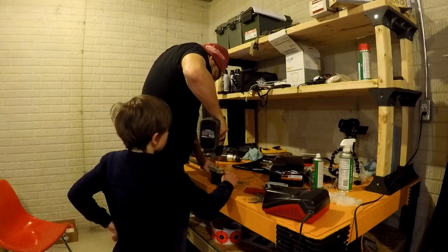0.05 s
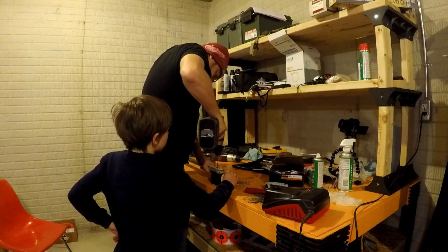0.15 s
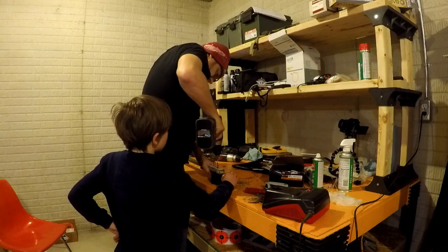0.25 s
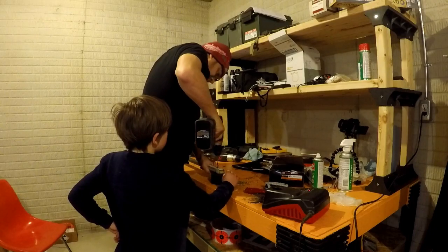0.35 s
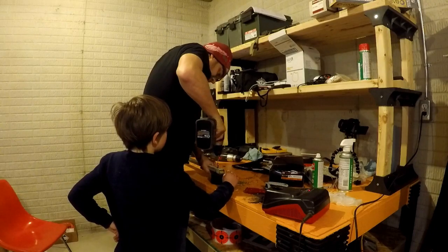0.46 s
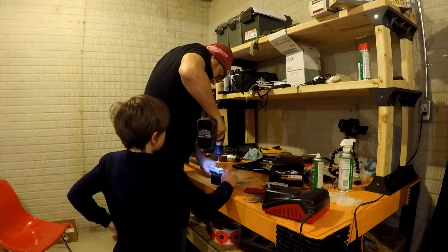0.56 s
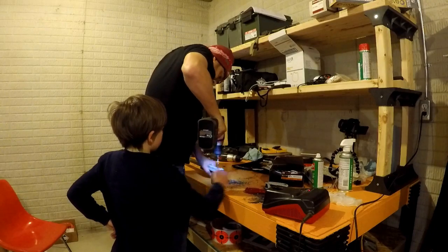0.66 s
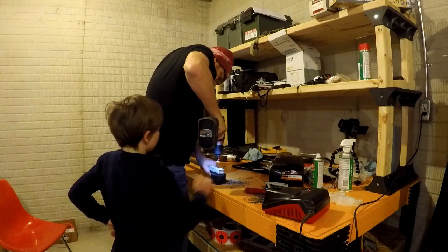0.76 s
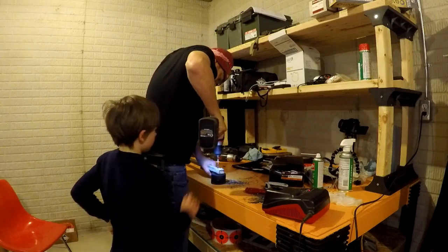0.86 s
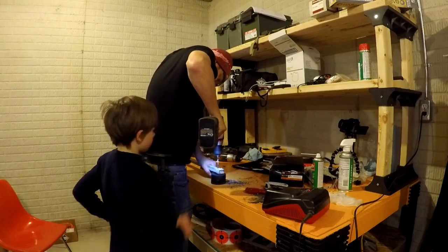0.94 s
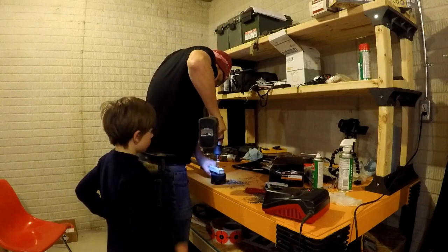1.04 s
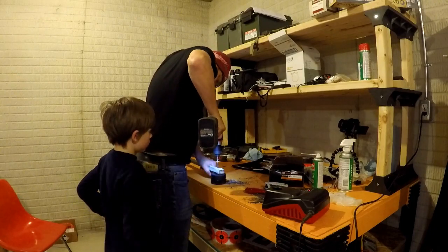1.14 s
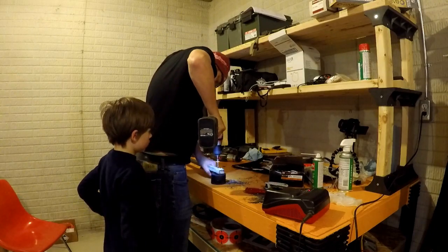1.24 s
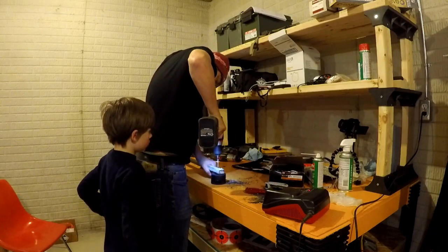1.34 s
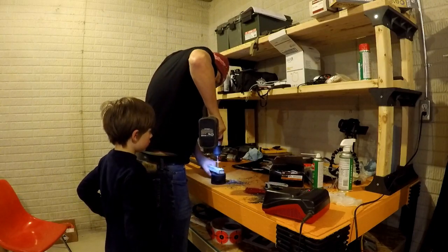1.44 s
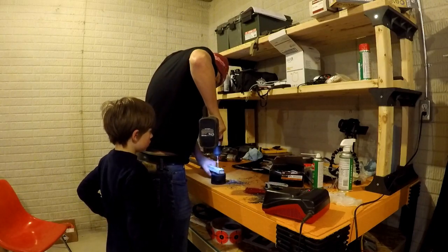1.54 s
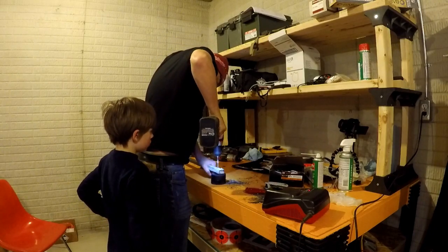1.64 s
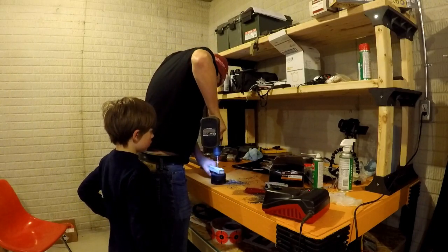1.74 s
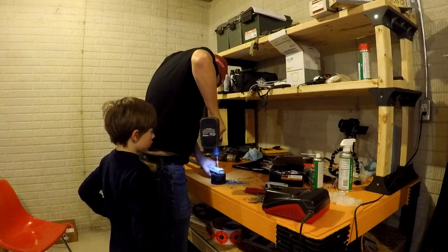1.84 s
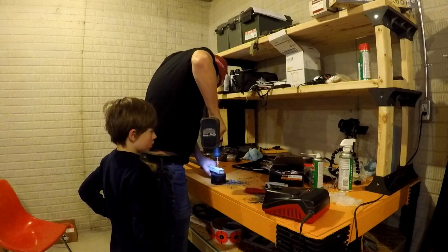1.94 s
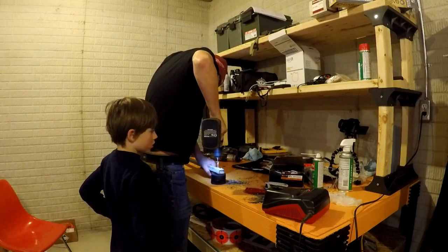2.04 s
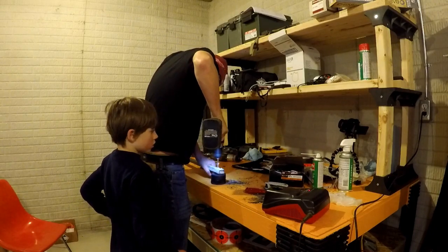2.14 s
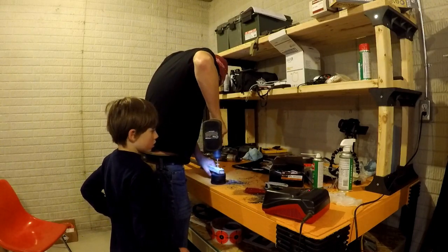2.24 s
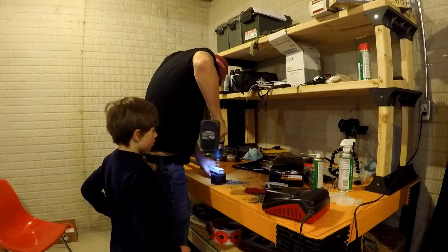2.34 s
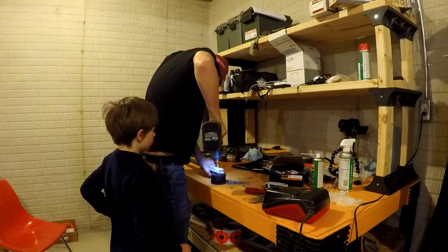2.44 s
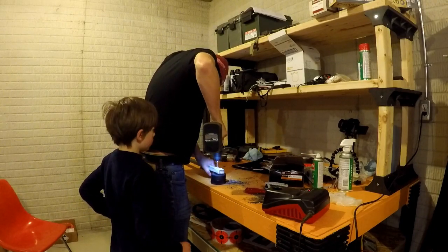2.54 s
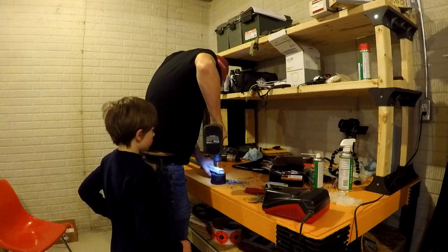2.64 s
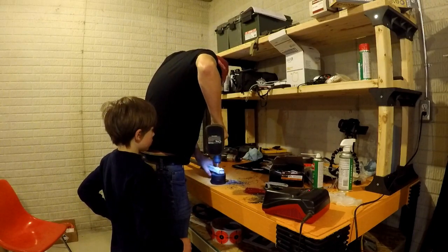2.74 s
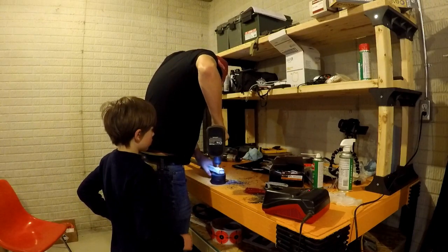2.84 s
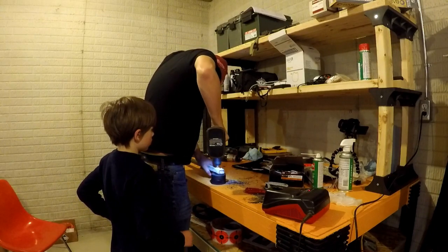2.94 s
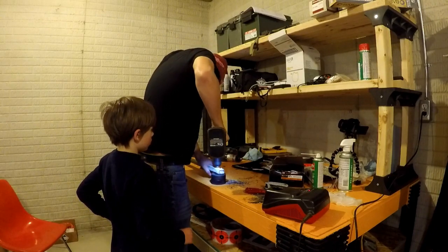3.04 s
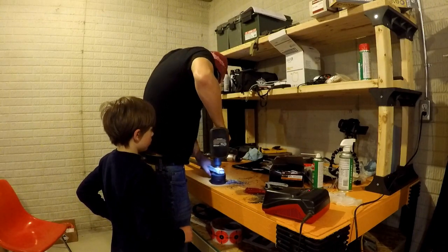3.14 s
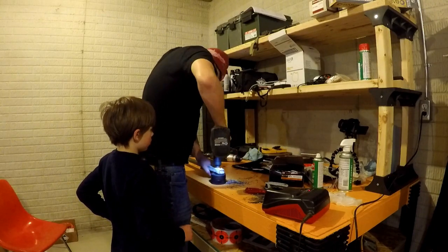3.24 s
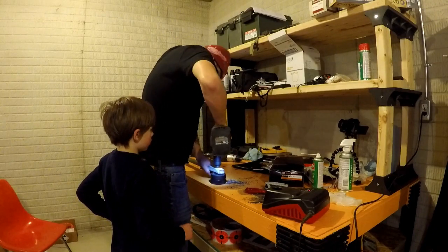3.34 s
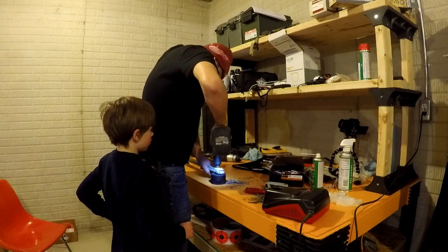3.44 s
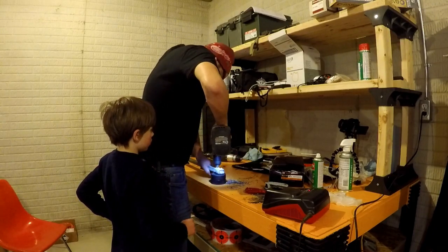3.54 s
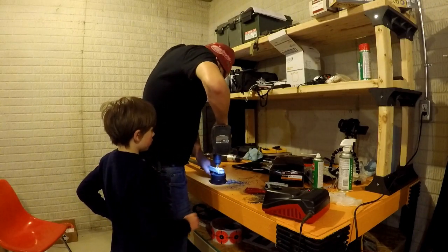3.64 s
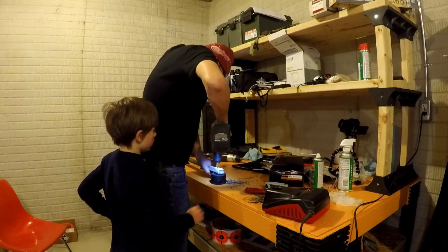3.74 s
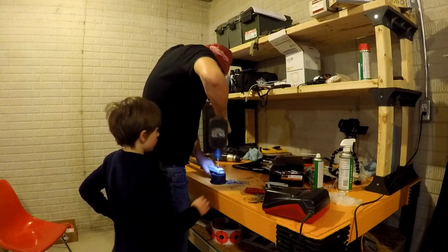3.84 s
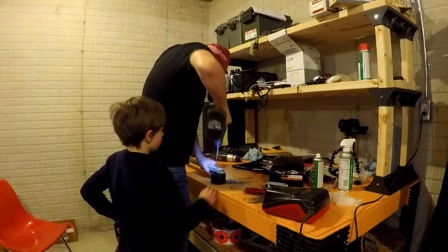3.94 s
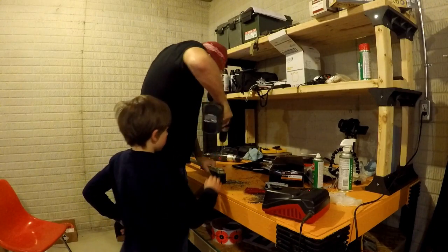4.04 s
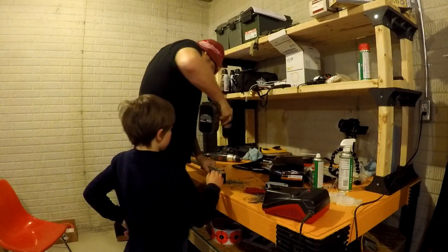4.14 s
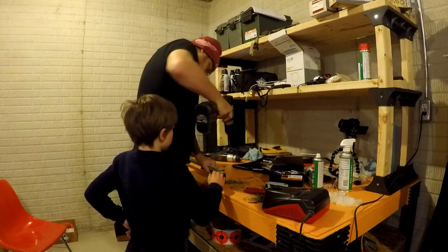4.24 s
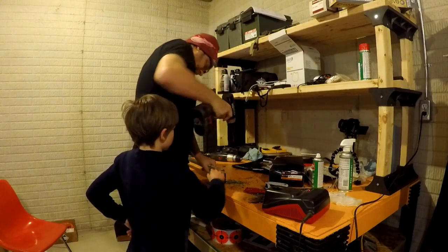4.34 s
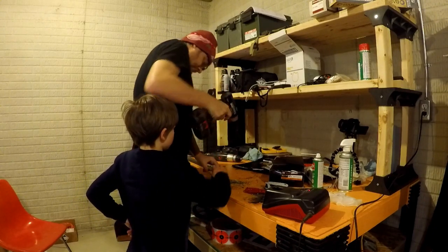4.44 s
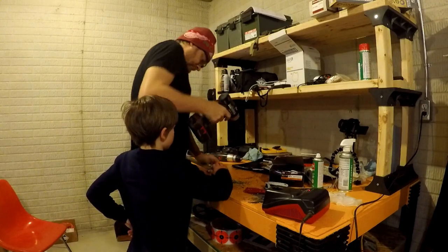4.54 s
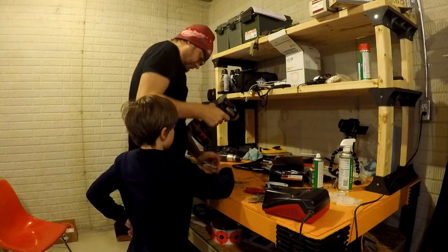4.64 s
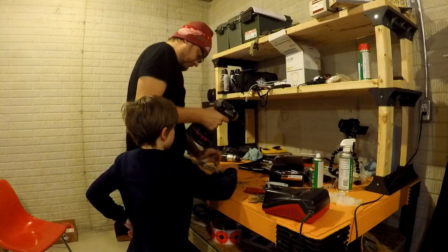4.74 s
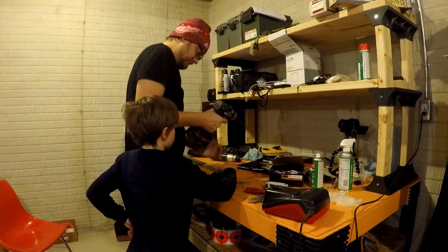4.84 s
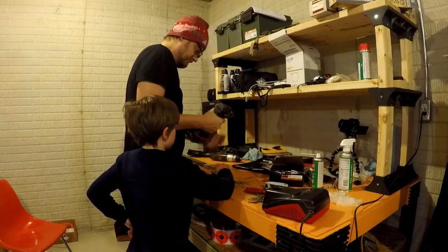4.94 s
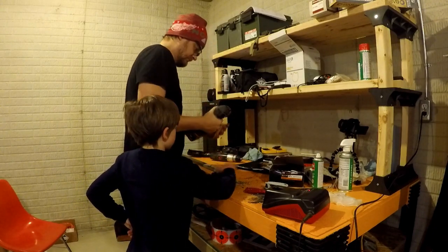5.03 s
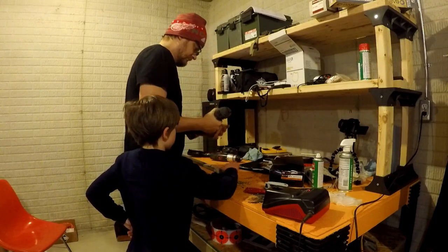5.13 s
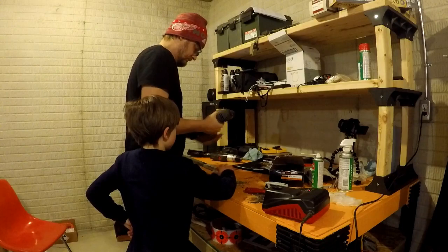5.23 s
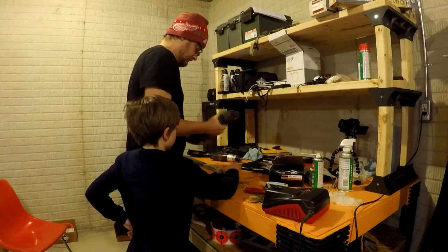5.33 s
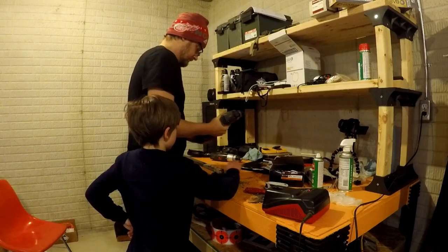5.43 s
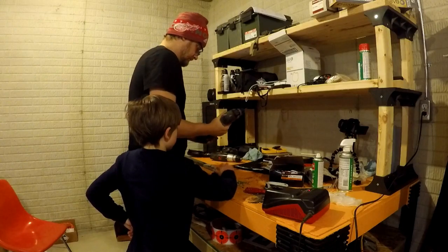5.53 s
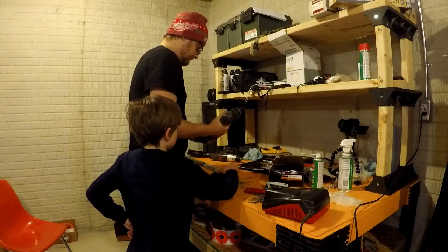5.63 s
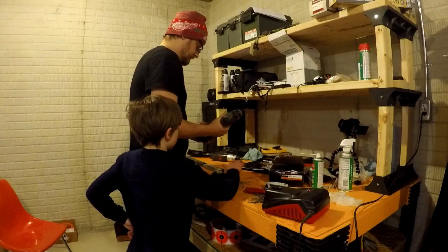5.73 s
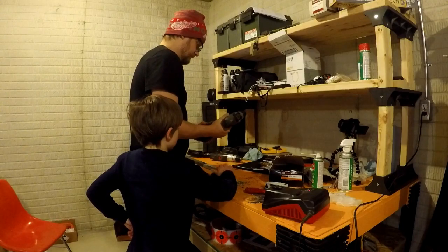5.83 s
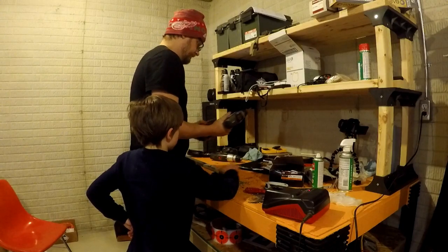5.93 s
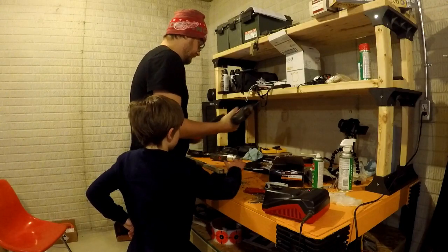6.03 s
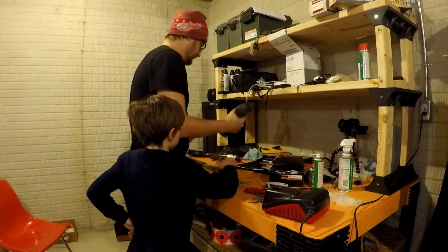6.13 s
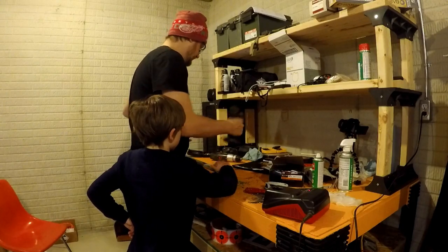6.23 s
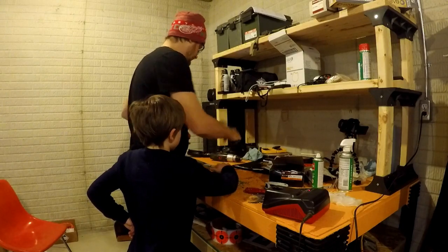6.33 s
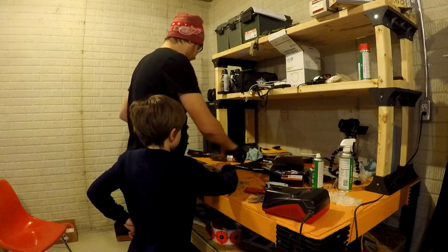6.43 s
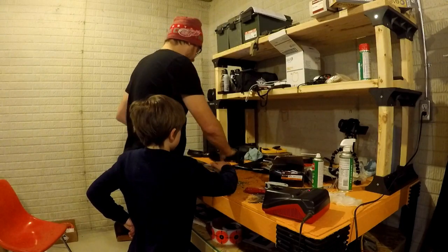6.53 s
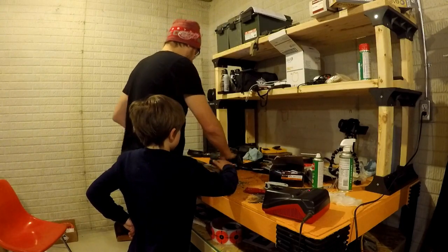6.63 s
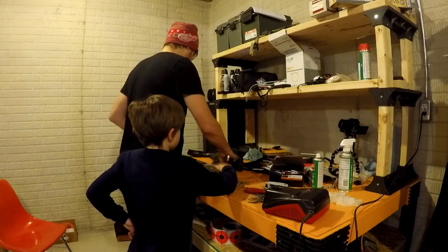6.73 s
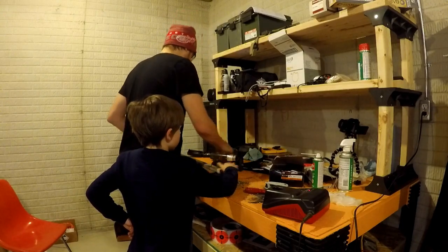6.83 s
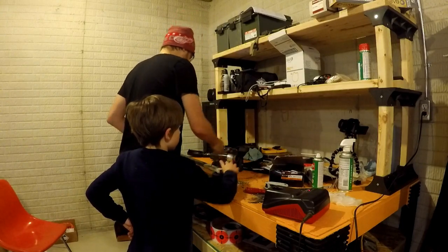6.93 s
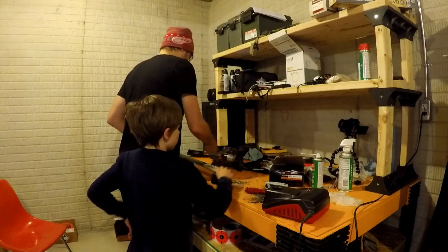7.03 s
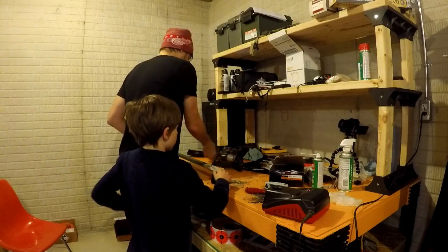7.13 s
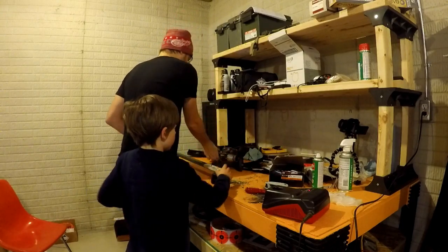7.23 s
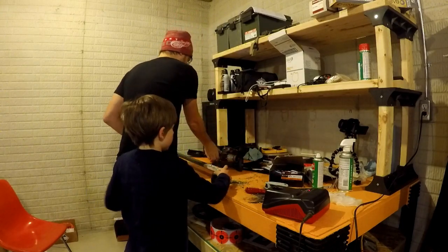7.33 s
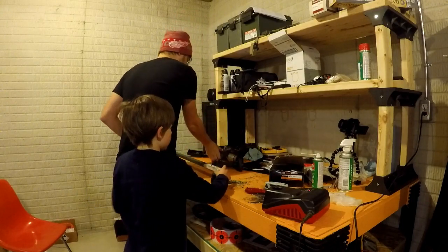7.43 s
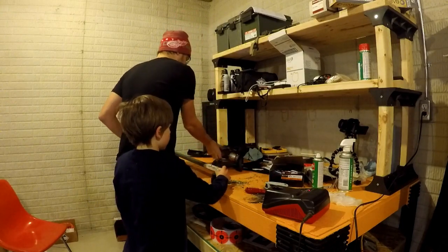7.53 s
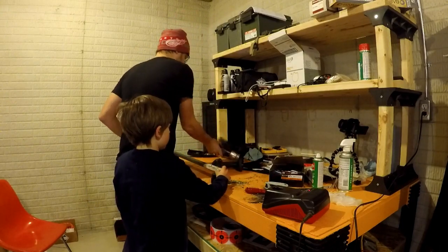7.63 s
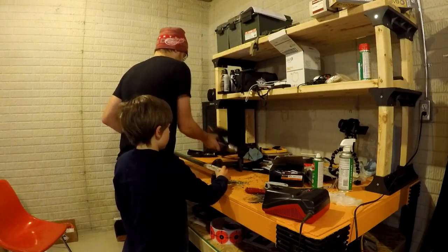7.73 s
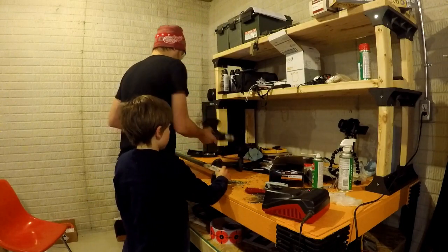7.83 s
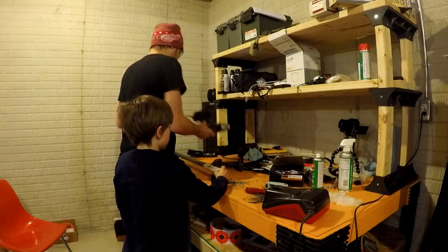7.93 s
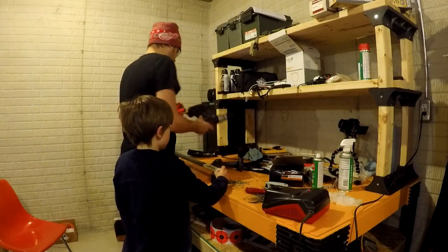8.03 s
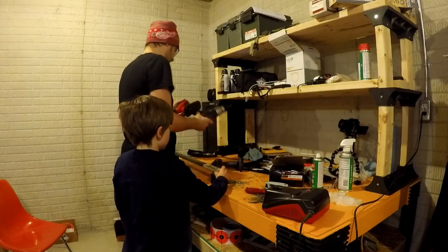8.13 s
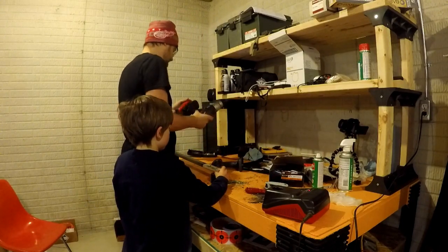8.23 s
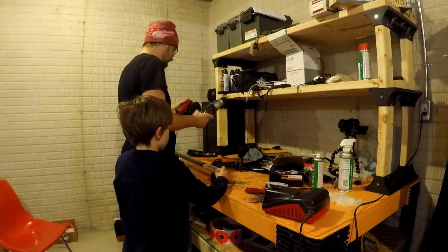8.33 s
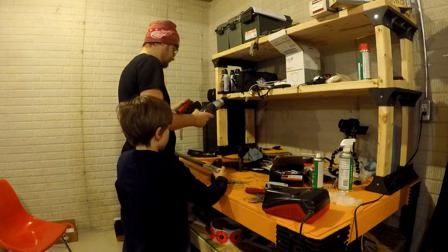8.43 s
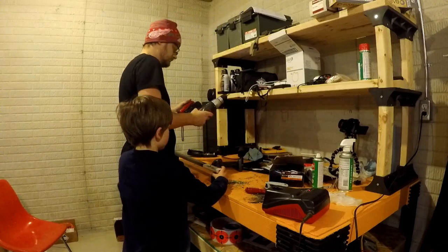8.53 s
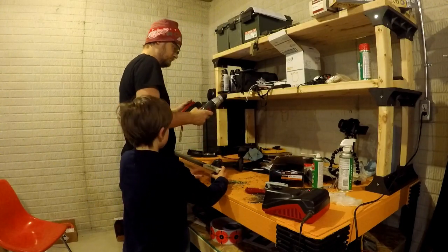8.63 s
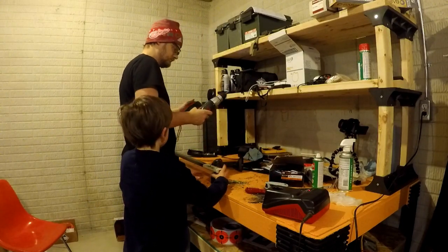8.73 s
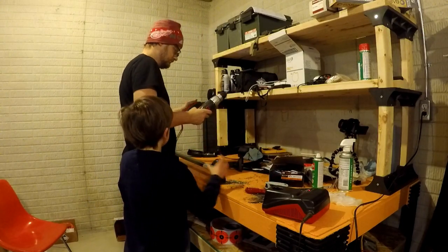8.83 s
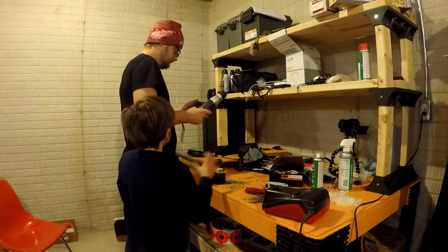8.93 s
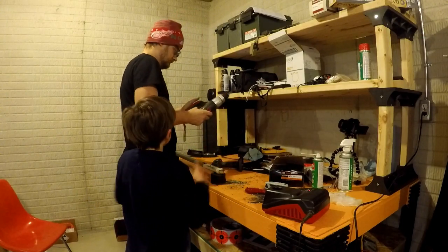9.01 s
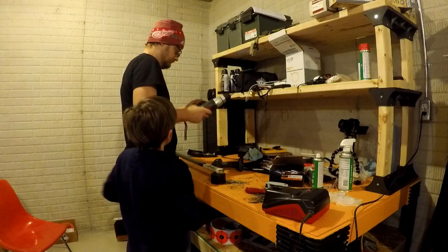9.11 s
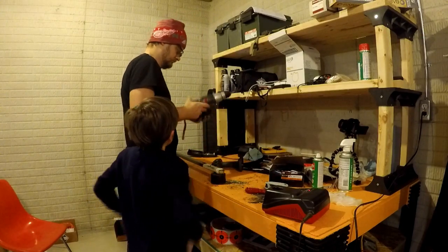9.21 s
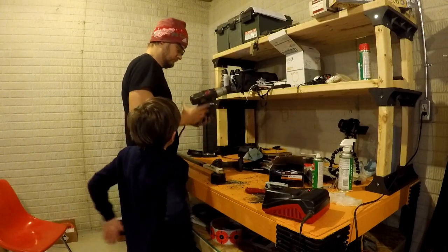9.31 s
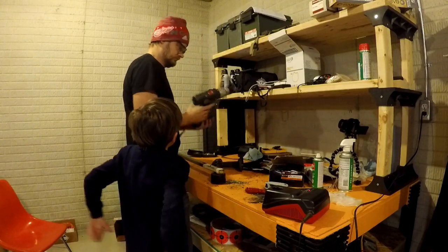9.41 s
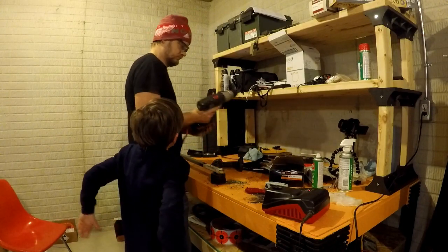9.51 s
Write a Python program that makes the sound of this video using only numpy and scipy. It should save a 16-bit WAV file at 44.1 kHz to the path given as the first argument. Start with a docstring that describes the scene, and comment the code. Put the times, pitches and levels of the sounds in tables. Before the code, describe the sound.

Power drill whine sags under load and recovers, a wooden workbench shudders, then tools thump, knock and clack on the bench in an echoing room.

```python
"""Cordless drill at a basement workbench

A cordless drill drives a long screw into a wooden bench in a bare, block-walled basement room.
Gear noise and lines that follow the shaft speed spin up, sag under the screw's drag and recover.
The bench rumbles as filtered noise and thumps in decaying low modes when blows land on it.
Hard contacts are noise bursts with a ringing body; knocks ring the drill's hollow plastic shell.
Echoes of the room, a brief scuff and a low rush of air surround them."""
import sys
import numpy as np
from scipy import signal
from scipy.fft import rfft, irfft, next_fast_len
from scipy.io import wavfile
from scipy.ndimage import uniform_filter1d, minimum_filter1d

SR = 44100
rng = np.random.default_rng(int(sys.argv[2]) if len(sys.argv) > 2 else 0)


def log_audio(samples):
    """Write samples as a 16-bit WAV file to the path given in sys.argv[1]."""
    # one column per channel
    frames = np.atleast_2d(samples).T
    # limit to full scale, then quantise
    limited = np.clip(frames, -1, 1)
    pcm = np.round(limited * 32767).astype(np.int16)
    wavfile.write(sys.argv[1], SR, pcm)


N = 422037
T = np.arange(N) / SR  # time of every sample [s]

# the trigger is half pulled, pulled right in, then let go [s]
HALF_S, FULL_S, RELEASE_S = .57, 1.09, 4.055
FULL_HZ = 352  # unloaded shaft speed at full trigger [turns per second]

# drag of the screw, tightest midway: (time [s], shaft speed lost [turns per second])
DRAG = [(1.33, 0), (1.45, 4.5), (1.6, 3), (1.9, 15), (2.22, 21), (2.38, 11), (2.48, 22), (2.6, 29),
        (2.7, 42), (2.85, 58), (2.99, 88), (3.09, 93), (3.27, 74), (3.38, 65), (3.64, 47), (3.71, 37),
        (3.82, 13), (3.92, 1)]
# blows on the bench: (time [s], level [dB], tilt [dB per octave], damping [factor on the decay rate])
THUMPS = [(1.955, -6, 5, 2), (2.33, -10, -3, 1.9), (2.426, 10, -17, 6), (2.441, 13, 6.5, 4.7),
          (2.46, 5, -2, 3.9), (2.54, -13.5, -20, 2.2), (3.825, -9.5, 13.5, 2.9), (4.35, -37, 4, 0.95),
          (6.426, -36, -5, 1.24), (6.475, -35.5, -3, 1.6), (6.666, 3, 8, 1.1), (6.785, 2, 10.5, 1.8),
          (7.182, -17, 5, 1.47), (7.386, 6, -4.5, 1.88), (7.495, -3.5, 3, 2.13), (7.534, -7.5, -19, 1.5),
          (7.633, -2, -6.5, 2.33), (7.735, -18, 4, 1.6)]


def amp(db):
    """Turns decibels into gain."""
    return 10 ** (np.asarray(db) / 20)


def unit(x):
    """Scales to rms 1."""
    return x / np.sqrt(np.mean(abs(x) ** 2) + 1e-20)


def read(points, hz):
    """Reads a spectrum table on a log-frequency axis."""
    f, value = np.transpose(points)
    return np.interp(np.log(hz + 1), np.log(f + 1), value)


def curve(rows, axis=1, outside=None):
    """Draws one column of a time table at every sample."""
    rows = np.array(rows, float)
    return np.interp(T, rows[:, 0], rows[:, axis], outside, outside)


def add(mix, s, sound):
    """Mixes a sound in at time s."""
    part = mix[..., round(s * SR):][..., :sound.shape[-1]]
    part += sound[..., :part.shape[-1]]


def shape(x, gain):
    """Filters by a gain given as a function of frequency."""
    size = next_fast_len(x.shape[-1])
    spectrum = rfft(x, size) * gain(np.fft.rfftfreq(size, 1 / SR))
    return irfft(spectrum, size)[..., :x.shape[-1]]


def colour(x, points):
    """Filters x by a spectrum table, at rms 1."""
    return unit(shape(x, lambda hz: amp(read(points, hz))))


def bump(hz, centre_hz, octaves):
    """A bell of height 1 on a log-frequency axis."""
    return np.exp(-(np.log2((hz + 1) / centre_hz) / octaves) ** 2)


def wander(hz):
    """A random drift of rms 1, with two new knots per cycle of hz."""
    knots = np.arange(0, T[-1] + 1, .5 / hz)
    return unit(np.interp(T, knots, rng.standard_normal(len(knots))))


def even(x, evenness=.7):
    """Smooths out a share (evenness) of the chance swings in a rumble's level, at rms 1."""
    power = abs(uniform_filter1d(x ** 2, size=1500))
    return unit(x / (power + 1e-9) ** (evenness / 2))


def causal(x, db):
    """Filters by a dB spectrum on the bins of x, at minimum phase so nothing rings ahead of the hit."""
    cepstrum = irfft(np.log(amp(np.maximum(db, -100))))
    half = len(cepstrum) // 2
    # folding the cepstrum onto positive time gives the minimum phase
    cepstrum[1:half] *= 2
    cepstrum[half + 1:] = 0
    return irfft(rfft(x) * np.exp(rfft(cepstrum)))


def diffuse(pair):
    """Two unrelated signals become a diffuse field whose likeness left to right varies with pitch."""
    # likeness of diffuse sound at the two microphone ports: (frequency [Hz], correlation)
    likeness = [(120, 0.83), (250, 0.14), (500, 0), (1000, 0), (2000, 0), (4000, 0.82), (8000, 0)]
    mid = shape(pair[0], lambda hz: np.sqrt((1 + np.clip(read(likeness, hz), -1, 1)) / 2))
    side = shape(pair[1], lambda hz: np.sqrt((1 - np.clip(read(likeness, hz), -1, 1)) / 2))
    return np.array([mid + side, mid - side])


def tail(build_s=0.0012, size=32768):
    """The echo of block walls at energy 1, each band dying at its own speed."""
    # reverberation: (frequency [Hz], time to fall 60 dB [s])
    decay = [(100, 0.68), (300, 0.83), (1000, 1), (3000, 0.72), (6000, 0.64), (12000, 0.44)]
    hz, t, bands = signal.stft(diffuse(rng.standard_normal((2, size))), SR, nperseg=256)
    bands = bands * amp(-60 * t / read(decay, hz)[:, None])
    echo = signal.istft(bands, SR, nperseg=256)[1][:, :size]
    echo *= 1 - np.exp(-np.arange(size) / SR / build_s)
    return echo / np.linalg.norm(echo[0])


def room(x, wet_db, early_db):
    """Joins direct sound, early reflections and the tail, at a fixed total energy."""
    # reflections off bench, shelves and walls: (left delay [s], right delay [s], relative level [dB])
    reflections = [(.0021, .0024, 3), (.0053, 0.0068, -4), (.0072, 0.007, -5), (0.0093, 0.0054, -17),
                   (0.014, .0138, -5), (0.0192, 0.013, -15)]
    response = amp(wet_db) * tail()
    response[:, 0] += 1
    for left, right, db in reflections:
        response[[0, 1], [round(left * SR), round(right * SR)]] += amp(db + early_db)
    response /= np.linalg.norm(response[0])
    return signal.fftconvolve(x[None], response, axes=1)[:, :N]


def ports(x):
    """The two microphone ports hear the bench with different level and phase."""
    # level difference: (frequency [Hz], left over right [dB])
    balance = [(60, -2), (170, 0.5), (380, -7), (700, -6), (1290, 1), (2400, -1), (4400, 1), (7500, .5),
               (9500, -9.5), (12000, 1)]
    # phase difference: (frequency [Hz], left's lead [rad])
    lead = [(3000, 0), (6700, 1.07), (9000, -3.5), (10500, 14.5), (11800, -5.5)]
    sign = np.array([[1], [-1]])  # each port takes half the difference

    def port_gain(hz):
        return amp(read(balance, hz) / 2) ** sign * np.exp(.5j * read(lead, hz) * sign)

    return shape(x, port_gain)


def air(level_db=-50, drift_db=-1.0, low_hz=105):
    """The low rush and hiss of the basement: diffuse noise, thinned in the bass, drifting slightly."""
    # (frequency [Hz], relative level [dB per Hz])
    air_tone = [(15, -43), (25, -11), (82, -39), (148, -1), (183, 1), (209, -0.5), (313, -6), (741, -14),
                (1080, -15.5), (3630, -25), (4620, -29), (6050, -24.5), (9550, -26.5), (12500, -37),
                (15500, -45)]
    rush = colour(diffuse(rng.standard_normal((2, N))), air_tone)
    rush = shape(rush, lambda hz: .4 + .6 * hz ** 6 / (hz ** 6 + low_hz ** 6))
    return rush * amp(level_db + drift_db * wander(1.0))


def scuff(grain=0.27):
    """A brief grainy rub: coloured noise of uneven strength."""
    # (time [s], level [dB])
    rub_level = [(5.87, -61), (5.905, -41.5), (5.94, -46.5), (5.975, -32.5), (5.99, -54), (6.02, -78)]
    # (frequency [Hz], relative level [dB per Hz])
    rub_tone = [(210, -46), (350, -31), (485, -1.5), (605, -10), (651, -15), (712, -0.5), (813, -26.5),
                (1050, -9), (1290, -21), (1490, -4), (2470, -18), (3310, -12.5), (4940, -20), (5730, -10.5),
                (12000, -42), (15600, -72), (22000, -120)]
    grains = rng.standard_normal(N) * np.exp(grain * wander(200))
    return colour(grains, rub_tone) * amp(curve(rub_level, outside=-120))


def knocks(centre_hz=1000):
    """Each handling knock rings the drill's hollow body; a rising tilt favours the high modes."""
    # the drill is set down and handled: (time [s], level [dB], tilt [dB per octave])
    hits = [(6.667, -22, 3.5), (7.384, -30, -6), (8.221, -28.5, 3), (8.262, -43, 4), (8.322, -33.5, -0.5),
            (8.356, -41, 3), (8.638, -36, -3)]
    # modes of the hollow plastic body: (frequency [Hz], relative level [dB], time to fall 60 dB [s])
    shell_modes = [(168, -5, 0.23), (326, -6, 0.14), (441, -9, 0.1), (499, -3.5, 0.11), (993, -9, 0.091),
                   (1350, -4, 0.12), (1590, -5, 0.12), (1823, -4.5, 0.07), (3080, -12.5, 0.05),
                   (3326, -12.5, 0.036), (4980, -13, 0.06)]
    out, t = np.zeros(N), np.arange(SR // 2) / SR
    for s, db, tilt_db in hits:
        for hz, mode_db, t60 in shell_modes:
            level_db = db + mode_db + tilt_db * np.log2(hz / centre_hz)
            tone = np.sin(2 * np.pi * (hz * t + rng.random()))
            add(out, s, amp(level_db - 60 * t / t60) * tone)
    return room(out, wet_db=-5, early_db=-3.5)


def clacks(ring_db=-7, bright_hz=3500, dull_hz=9500, spread=0.3, size=32768):
    """A crack, the dense short ring of a hard casing, then the room; soft contacts swell and ring longer."""
    # hard contacts: (time [s], level [dB], body resonance [Hz], its boost [dB], brightness [dB],
    # rise [s], room echo [dB])
    contacts = [(.587, -29, 3800, 9, -21, 0.0018, 5), (.83, -14, 2400, 11, 6, .00014, 1.5),
                (2.444, -6.5, 380, 9, -20, 0.0033, -1.5), (4.011, -10.5, 3580, 3, 11, 0.0012, -0.5),
                (4.718, -45, 6500, 9, 4, .0011, 0), (4.749, -44, 2450, 12, 2, .001, -2),
                (4.865, -46, 2300, 17, 3, .002, -3), (5.019, -45, 1900, 20, -5, .003, -4),
                (5.732, -41.5, 4020, 6, 19, .0036, -2), (6.235, -42, 3000, 6, 6, .006, 2),
                (6.319, -40, 4000, 11, 0, .006, -4), (6.6662, -5.5, 1550, 9, -11, 0.00022, -9),
                (6.673, -0.5, 584, 17, -9.5, 0.0034, -1), (6.757, -6, 415, 26, -9, 0.0024, -2),
                (7.3849, -17, 2070, -6.5, -9, 0.00044, -1), (7.39, -11, 305, 14.5, -27, 0.004, -0.5),
                (7.394, -18.5, 940, 20, -19, 0.0047, 2), (7.497, -28, 910, 10, -27, .008, -5),
                (7.625, -33.5, 2200, 15, -2, .0015, -4.5), (7.628, -24.5, 450, 16, -10, .007, -3),
                (7.656, -38.5, 6000, 9, 3, .002, 0.5), (8.2201, -16.5, 1400, 15.5, 8, 0.0003, -2),
                (8.226, -17, 234, 22, -7, 0.00087, -2), (8.322, -29.5, 1390, 4, 9, .003, -5),
                (8.637, -21, 330, 10.5, 3, 0.0045, 0.5), (8.704, -31, 5960, 6, 10, 0.0018, -0.5),
                (8.835, -25, 300, 15, 2, .03, 2), (8.9, -19, 1500, 4, -7, 0.00019, 3),
                (8.908, -9.5, 3300, 1.5, 3, 0.0024, -1), (8.936, -1, 3760, 5, 6.5, 0.000051, -2.5),
                (9.0174, -4.5, 2610, 5, 10, .0004, 2.5), (9.382, -30, 440, 15, -1, .0015, -4.5),
                (9.432, -28, 3980, 6, 3, 0.027, 1.5)]
    # (frequency [Hz], relative level [dB per Hz])
    casing_tone = [(88, -18.5), (150, -10.5), (326, -5.5), (366, -4.5), (436, -2), (509, -3.5), (656, -4),
                   (1320, -4.5), (1660, -3.5), (3830, -9), (5230, -11), (6230, -5), (12500, -38),
                   (15500, -49)]
    firm_s, firm_ring_s, ring_power = 0.00083, 0.066, .21  # a contact rising in firm_s rings firm_ring_s
    crack_share, body_octaves = 0.013, .55  # crack's time constant as a share of the ring; body width
    out, t, hz = np.zeros((2, N)), np.arange(size) / SR, np.fft.rfftfreq(size, 1 / SR)
    for s, db, body_hz, body_db, bright_db, rise, wet_db in contacts:
        ring_s = firm_ring_s * (rise / firm_s) ** ring_power
        snap, centre, side = rng.standard_normal((3, size))
        casing = centre + spread * side * [[1], [-1]]  # the shelves scatter the ring to both sides
        crack = snap * np.exp(-t / (crack_share * ring_s))
        blow = crack + amp(ring_db) * casing * np.exp(-np.log(1000) * t / ring_s)
        blow *= 1 - np.exp(-t / rise)
        blow += amp(wet_db) * np.linalg.norm(blow[0]) * tail(size=size)
        # each struck part has its own hollow resonance
        body = body_db / (1 + (np.log2((hz + 1) / body_hz) / body_octaves) ** 2)
        tone_db = read(casing_tone, hz) + body + bright_db * hz ** 2 / (hz ** 2 + bright_hz ** 2)
        # dull contacts lose the very top as well
        tone_db += min(bright_db, 0) * np.minimum(hz / dull_hz, 4 / 3) ** 4
        add(out, s, amp(db) * causal(blow, tone_db) / np.sqrt(np.mean(amp(tone_db) ** 2)))
    return out


def thumps(centre_hz=160):
    """Each blow sets the heavy bench swinging in its low modes, which build up and die away."""
    # bench modes: (frequency [Hz], relative level [dB], time to fall 60 dB at damping 1 [s], build-up [s])
    bench_modes = [(60.7, -32, 0.62, 0.014), (93.1, -18.5, 0.47, 0.012), (151.4, -3.5, 0.36, 0.015),
                   (161.5, 11.5, 0.16, 0.031), (206.2, -13, 0.64, 0.025), (266.6, -0.5, 0.11, 0.013),
                   (304, -20, 0.31, 0.017), (341.4, -25.5, 0.62, 0.014), (378, -35.5, 0.44, 0.025),
                   (440.4, -32.5, 0.32, 0.018)]
    out, t = np.zeros(N), np.arange(SR) / SR
    for s, db, tilt_db, damping in THUMPS:
        for hz, mode_db, t60, build in bench_modes:
            level_db = db + mode_db + tilt_db * np.log2(hz / centre_hz)
            swing = (1 - np.exp(-(t / build) ** 2)) * np.exp(-np.log(1000) * damping * t / t60)
            add(out, s, amp(level_db) * swing * np.sin(2 * np.pi * hz * t))
    return out


def sway(level_db=-32, fall_db_per_s=25.5):
    """The level of the frame's slow sway: each blow adds its share of power, which dies away."""
    power = sum((T > s) * amp(db - fall_db_per_s * abs(T - s)) ** 2 for s, db, _, _ in THUMPS)
    return amp(level_db) * np.sqrt(power)


def motor(half_hz=231, half_lag_s=.185, full_lag_s=.05, brake_s=.14):
    """Unloaded shaft speed: it runs up toward each trigger setting in turn, then brakes."""
    half = half_hz * (1 - np.exp(-np.maximum(T - HALF_S, 0) / half_lag_s))
    speed = FULL_HZ + (half - FULL_HZ) * np.exp(-np.maximum(T - FULL_S, 0) / full_lag_s)
    return speed * np.exp(-np.maximum(T - RELEASE_S, 0) / brake_s)


def gear_level(full_db=-20.5, half_db=-2, speed_power=0.96):
    """Gears are louder the faster the motor runs; they quieten as the hand eases off and lets go."""
    ease_s, ease_db_per_s, stop_db_per_s = 3.785, 20.5, 702
    db = full_db + half_db * (T < FULL_S)  # half trigger is quieter
    db = db - ease_db_per_s * np.maximum(T - ease_s, 0)
    db = db - stop_db_per_s * np.maximum(T - RELEASE_S, 0)
    return amp(np.maximum(db, -120)) * (motor() / FULL_HZ) ** speed_power


def rumble(motor_frame_db=-49, motor_top_db=-7.5, grip_top_db=-4):
    """Motor and steadily slipping screw shake the bench: its frame sways, its top drums, as noise."""
    # bass rumble as the screw grips the wood: (time [s], level [dB])
    grip_level = [(1.78, -45), (1.92, -34.5), (2.05, -23.5), (2.3, -25.5), (2.62, -28.5), (3.15, -37.5),
                  (3.72, -32), (3.87, -30.5), (4.5, -69), (6.6, -83)]
    # swaying frame: (frequency [Hz], relative level [dB per Hz])
    frame_tone = [(13, -32), (22, -18), (32, -15), (50, -1), (64, 3), (80, -6), (99, -6.5), (115, -11),
                  (130, -5), (160, -3), (280, -120)]
    # drumming bench top: (frequency [Hz], relative level [dB per Hz])
    top_tone = [(68, -62), (115, -31), (155, 7.5), (178, 0), (197, 4.5), (215, 1), (240, 3), (300, -13.5),
                (340, -6), (398, -14.5), (430, -8), (550, -17), (920, -120)]
    slips = rng.standard_normal((2, N))
    gears, grip = gear_level(), amp(curve(grip_level, outside=-120))
    frame = np.hypot(grip, sway()) + amp(motor_frame_db) * gears
    motor_top = amp(motor_top_db) * gears * (1 - curve(DRAG) / FULL_HZ)  # drag slows the motor
    top = np.hypot(amp(grip_top_db) * grip, motor_top)
    return even(colour(slips[0], frame_tone)) * frame + even(colour(slips[1], top_tone)) * top


def controller():
    """The chopped motor current whistles at part throttle: a sine that glides in pitch."""
    # (time [s], frequency [Hz], level [dB])
    whistle = [(.54, 6440, -57), (.57, 6530, -49), (.66, 6610, -45), (.8, 6660, -33.5), (.92, 6590, -39),
               (1.1, 6690, -37), (1.16, 6700, -65)]
    level = np.sqrt(2) * amp(curve(whistle, axis=2, outside=-120))
    return level * np.sin(2 * np.pi * np.cumsum(curve(whistle)) / SR)


def whine(angle, backlash_hz=3., surge_hz_per_s=700, unload_db_per_s=110):
    """Lines at multiples of the shaft speed, levelled by load; gear lines fade in surges and once unloaded."""
    # shaft and gear lines: (multiple of shaft speed, then relative levels [dB] at half trigger,
    # running free, under light, medium and full load, then roughness [0-1])
    order_lines = [(1, -22, -15.5, -18.5, -13, -8, .2), (2.43, -17, -26, -24, -14.5, -10.5, .3),
                   (5.03, -17, -30, -30, -24, -15.5, .7), (5.24, -28, -17, -22, -20, -14, .5),
                   (10.05, -27, -28, -22, -15, -18, .55), (11.15, -27, -30, -19, -9, -9, .45),
                   (12, -13.5, -11, -10.5, -12, -15, .35), (12.5, -18, -21, -21, -14.5, -19, .85),
                   (15, -22, -24, -14, -22, -28, .4), (18, -20, -21, -21, -24, -25, .7),
                   (20, -19, -18, -15.5, -22, -28, .45), (22.6, -17, -28, -26, -15, -11.5, .85)]
    # running free, light, medium and full load: speed lost [turns per second]
    load_steps = [4, 20, 52, 90]
    # how well the housing radiates a line gliding through it: (frequency [Hz], gain [dB])
    housing = [(100, -30), (250, -0.5), (345, -1.5), (500, -4), (630, 3), (665, 6.5), (700, -3), (742, 3.5),
               (790, -9), (830, -14), (910, 4.5), (1100, -4), (1330, 1), (1450, -10), (1650, -7),
               (1800, -1), (2000, -3), (2200, -2), (2500, -2.5), (2750, -6), (2920, -3), (3080, 1),
               (3420, 2), (3650, 0), (4000, 0), (4200, -2), (7000, 2)]
    rougher, flutter_db, flutter_hz = .14, 2.0, 7  # added by strain or a half-pulled trigger
    home_s = 3.91  # the screw is home and the gears run unloaded
    drag = curve(DRAG)
    meshing = amp(-unload_db_per_s * np.maximum(T - home_s, 0))
    meshing = meshing / np.hypot(1, np.gradient(motor()) * SR / surge_hz_per_s)
    unsteady = np.where(T < FULL_S, 1, drag / drag.max())
    out = np.zeros(N)
    for multiple, half_db, *loads_db, rough in order_lines:
        rough = np.clip(rough + rougher * unsteady, 0, 1)
        width = backlash_hz * (multiple + 2)  # play in the gears smears high lines most
        smear = (wander(width) + 1j * wander(width)) / np.sqrt(2)
        backlash = np.sqrt(1 - rough ** 2) + rough * smear
        db = np.where(T < FULL_S, half_db, np.interp(drag, load_steps, loads_db))
        db = db + flutter_db * unsteady * wander(flutter_hz)
        line = np.sqrt(2) * (backlash * np.exp(1j * multiple * angle)).real
        out += amp(db) * (meshing if multiple > 2 else 1) * line  # the shaft itself hums on
    return shape(out, lambda hz: amp(read(housing, hz)))


def rattle(angle, beat=0.31, grain=0.075):
    """Gear teeth rattle in the housing: noise that beats once a turn, hollower and rasping at first."""
    # (frequency [Hz], relative level [dB per Hz])
    gearbox = [(180, -30), (300, -14), (342, -20), (543, -9.5), (652, -4), (1110, -9.5), (1780, -4),
               (2740, -5), (3280, -1.5), (4720, -3), (6050, 0.5), (6900, -2), (11300, -26.5),
               (14000, -29.5), (15500, -38)]
    hollow_db, hollow_hz, hollow_octaves = -4, 1500, 1.0  # a dip at half trigger
    rasp_db, rasp_hz, rasp_octaves, rasp_s = -2, 3700, .3, 0.2  # extra band as the gears start
    teeth = rng.standard_normal(N) * (1 + beat * np.cos(angle)) * np.exp(grain * wander(500))
    full = colour(teeth, gearbox)
    hollow = shape(full, lambda hz: amp(hollow_db * bump(hz, hollow_hz, hollow_octaves)))
    rasp = amp(rasp_db) * shape(full, lambda hz: bump(hz, rasp_hz, rasp_octaves))
    rasp *= np.exp(-((T - HALF_S) / rasp_s) ** 2)
    return np.where(T < FULL_S, hollow + rasp, full)


def drill(jitter=.0018, jitter_hz=18):
    """Rattle and whine share one shaft, which the screw's drag slows and whose speed wavers slightly."""
    speed = np.maximum(motor() - curve(DRAG), 0) * (1 + jitter * wander(jitter_hz))
    angle = 2 * np.pi * np.cumsum(speed) / SR
    effort = gear_level()
    rattling = room(rattle(angle) * effort, wet_db=-3.0, early_db=-14.5)
    return rattling + room(whine(angle) * effort, wet_db=-4.5, early_db=-16)


def scene():
    """The bench reaches the microphone mostly through its legs; airborne sounds come with the room."""
    small = room(controller() + scuff(), wet_db=-2.5, early_db=-5)
    bench = room(rumble(), wet_db=-9.0, early_db=-22) + room(thumps(), wet_db=-6.0, early_db=-23.0)
    return air() + ports(small + knocks() + clacks() + bench + drill())


def record(dry, knee_db=-14, squeeze=0.28, follower_fall_db_per_s=13.0, edge_hz=15200):
    """Gain control ducks loud sound and recovers slowly; a limiter holds peaks; a low-pass ends the band."""
    power_db = 10 * np.log10(abs(uniform_filter1d((dry ** 2).mean(0), size=600)) + 1e-12)
    # the level follower jumps up with peaks and falls at a steady rate
    fall = T * follower_fall_db_per_s
    follower_db = np.maximum.accumulate(power_db + fall) - fall
    over_db = np.maximum(follower_db - knee_db, 0)
    ducked = dry / amp(squeeze * uniform_filter1d(over_db, size=200))
    headroom = np.minimum(.96 / (abs(ducked).max(0) + 1e-9), 1)
    headroom = minimum_filter1d(headroom, size=129)
    held = ducked * uniform_filter1d(headroom, size=129)
    low_pass = signal.firwin(511, edge_hz, window=("kaiser", 9), fs=SR)
    return signal.oaconvolve(held, low_pass[None], "same")


dry = scene()
out = record(dry)
log_audio(out)
```